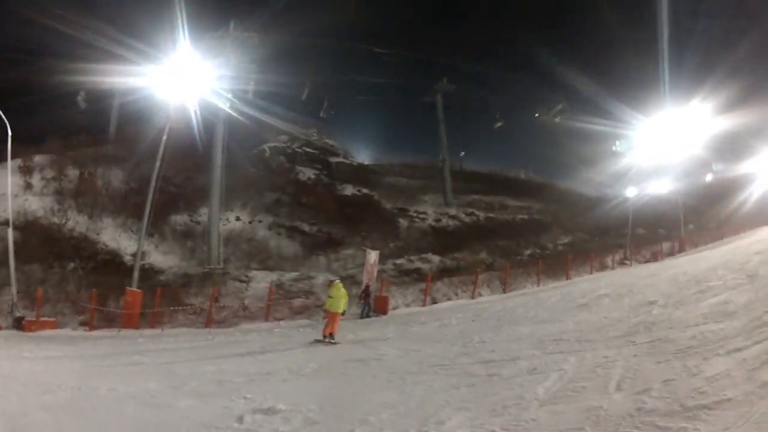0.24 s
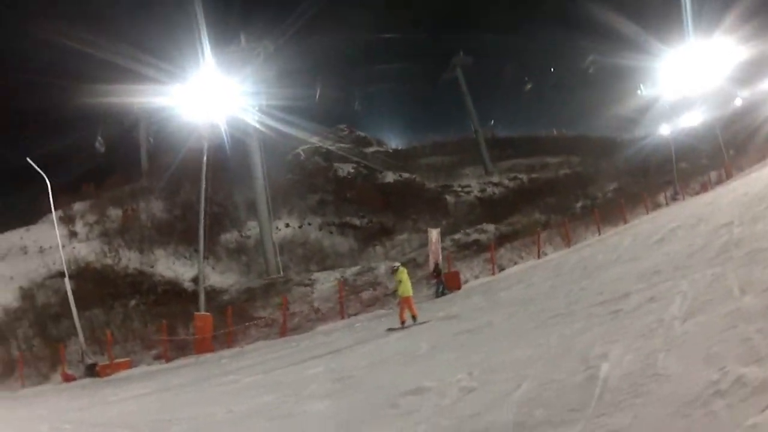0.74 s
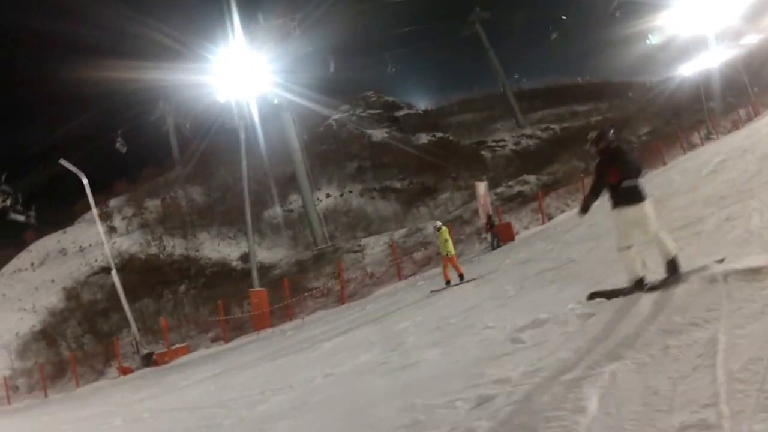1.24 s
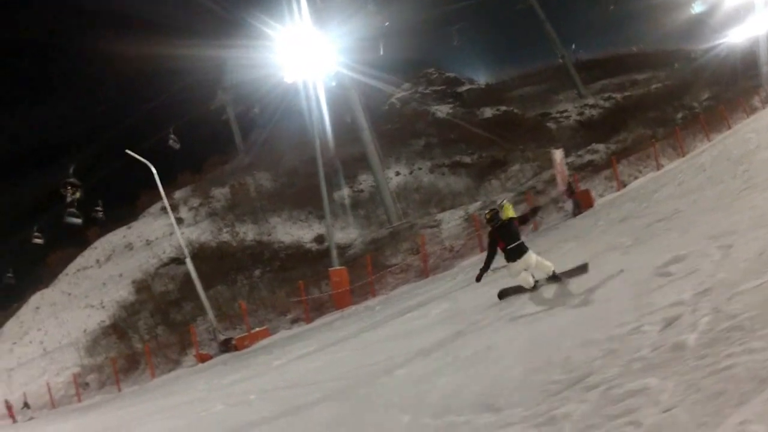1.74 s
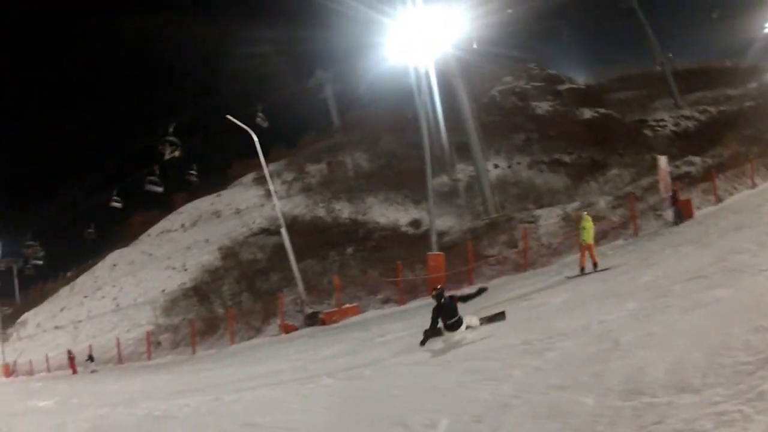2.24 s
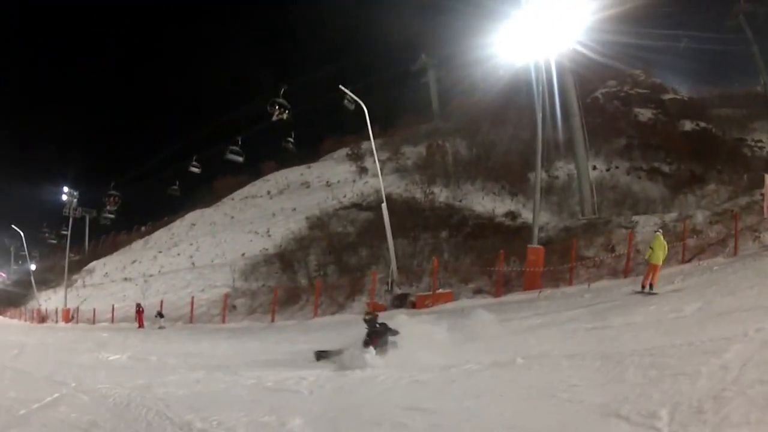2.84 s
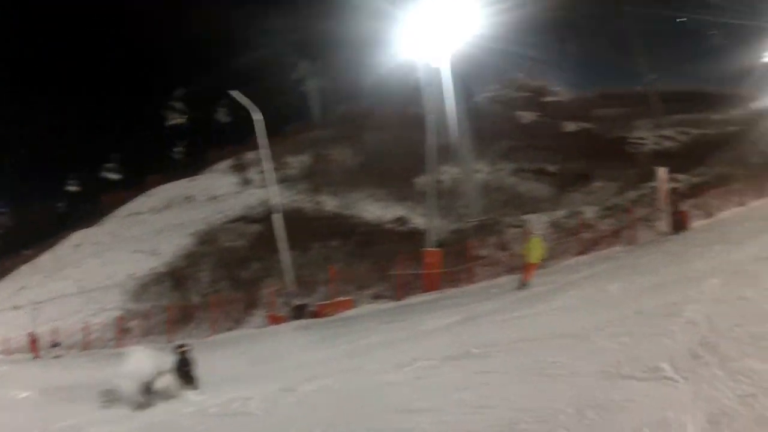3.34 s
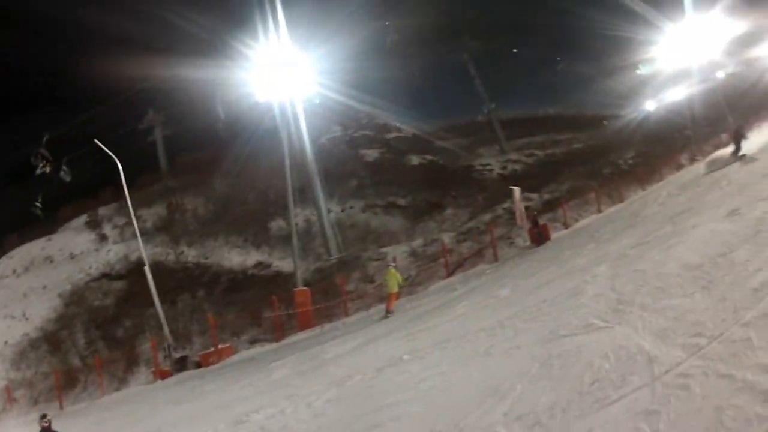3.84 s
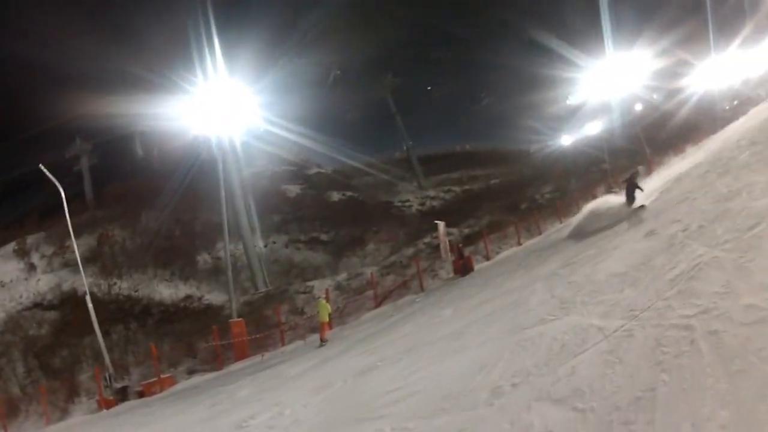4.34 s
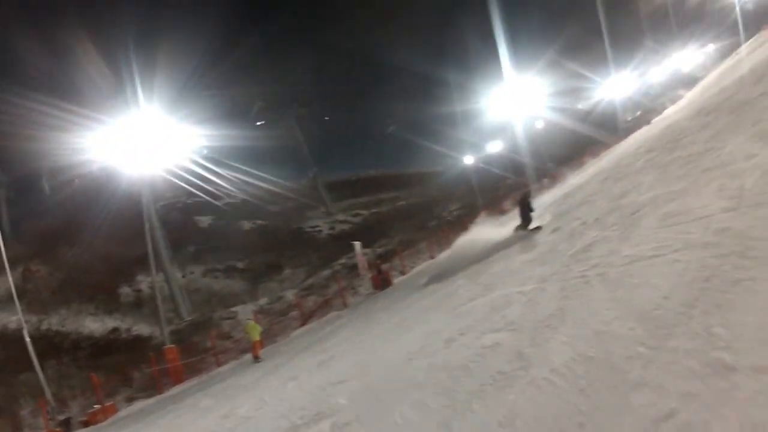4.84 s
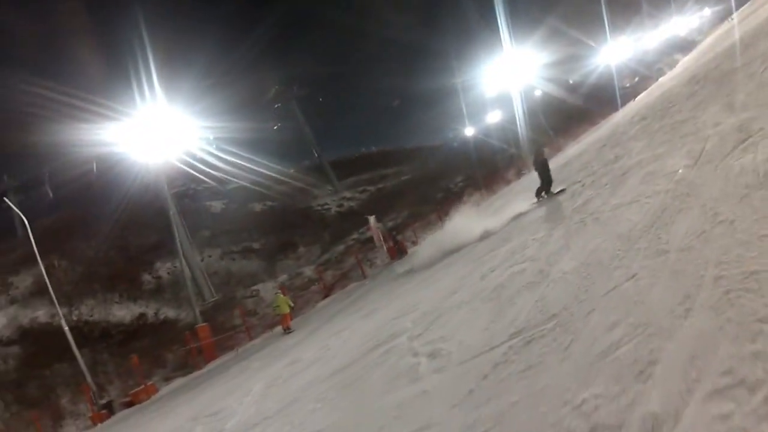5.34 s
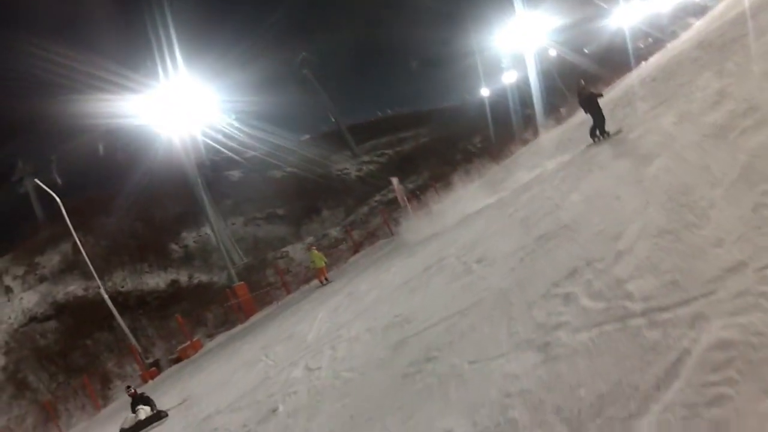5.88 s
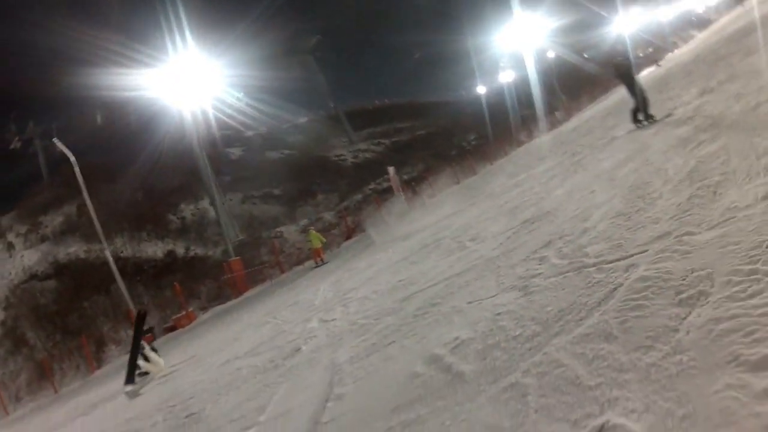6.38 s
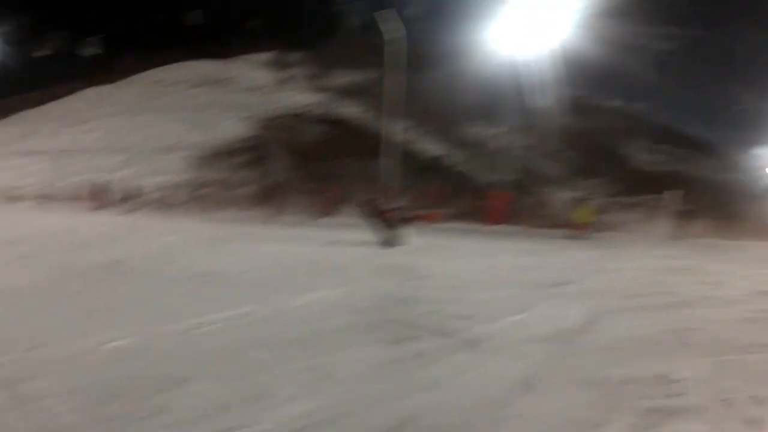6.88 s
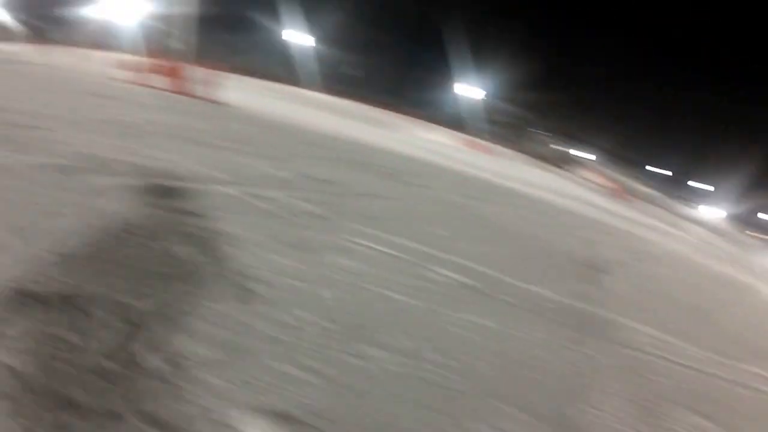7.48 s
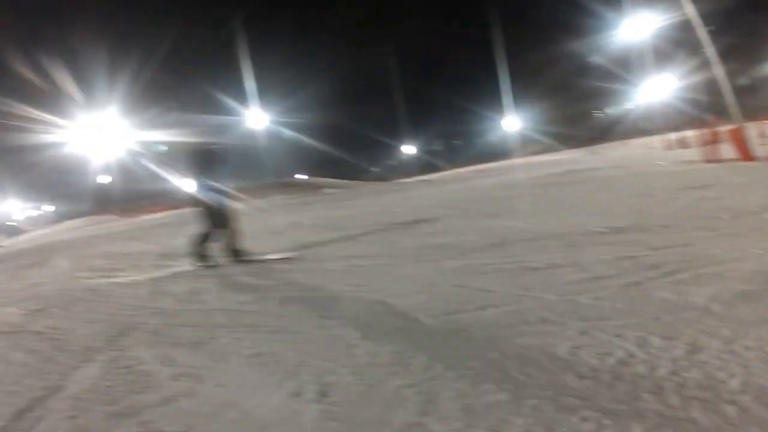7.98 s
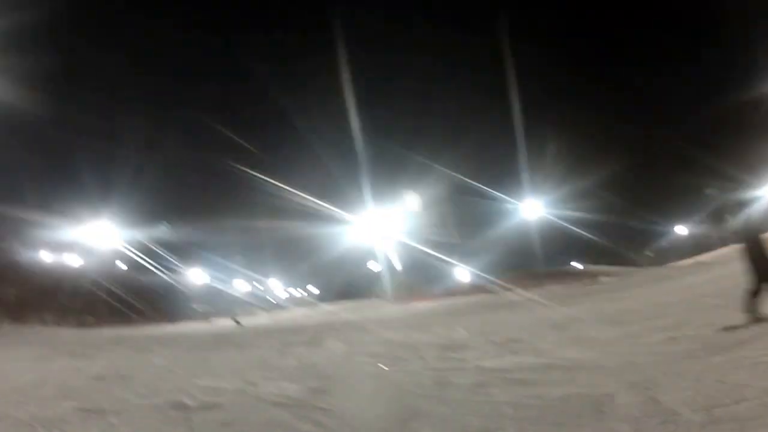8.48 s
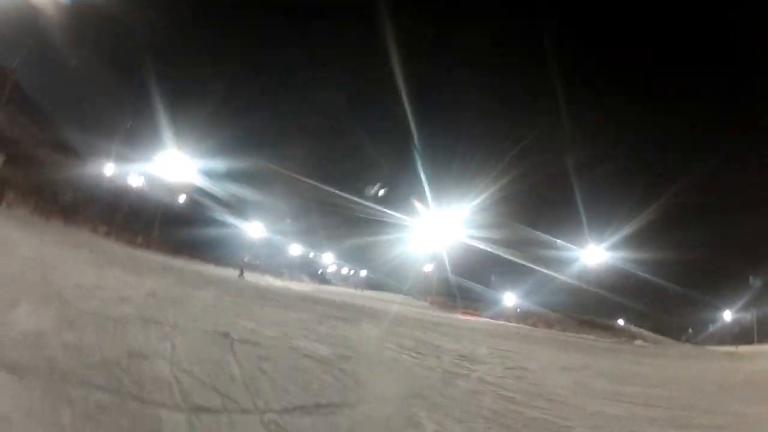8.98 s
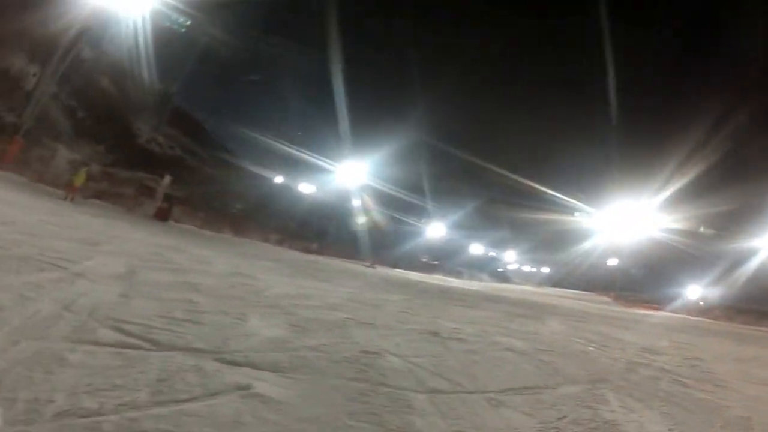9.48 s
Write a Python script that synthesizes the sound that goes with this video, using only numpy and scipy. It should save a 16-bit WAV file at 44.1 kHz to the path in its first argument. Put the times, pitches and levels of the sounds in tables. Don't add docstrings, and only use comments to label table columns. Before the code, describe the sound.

Heard from a small camera sealed in a plastic case on a night ski slope, a snowboard edge hisses and scrapes across groomed snow, swelling and fading with turns. Ice chips tick the shell and wind rumbles low. One short hard scrape stands out early on; near the end a violent knock and a second blow lead into creaks and glove rubbing.

```python
import sys
import numpy as np
from scipy import signal
from scipy.fft import rfft, irfft, next_fast_len
from scipy.io import wavfile
from scipy.ndimage import uniform_filter1d

SR = 44100
rng = np.random.default_rng(int(sys.argv[2]) if len(sys.argv) > 2 else 0)


def magnitude_from_level(level_db):
    exponent = np.asarray(level_db, float) / 20
    return 10 ** exponent


def wrap_up_sound(samples):
    columns = np.atleast_2d(samples).T
    tamed = np.clip(columns, -1, 1)
    steps = np.round(tamed * 32767).astype(np.int16)
    wavfile.write(sys.argv[1], SR, steps)


N = 428632
MEAN_SCRAPE_DB = -48


def rms_one(x):
    return x / np.sqrt(np.mean(x ** 2) + 1e-20)


def in_time(rows):
    s, *columns = np.transpose(rows)
    return [np.interp(np.arange(N) / SR, s, column) for column in columns]


def swell(s, hold_s, attack_s, release_s):
    corners = np.cumsum([-attack_s, attack_s, abs(hold_s), release_s])
    return np.interp(np.arange(N) / SR - s, corners, [0, 1, 1, 0])


def drift(rate_hz):
    pole = np.exp(-40 * np.pi * rate_hz / SR)
    noise = rng.standard_normal(N // 20 + 2002)
    slow = signal.lfilter([1], [1, -2 * pole, pole * pole], noise)[2000:]
    return np.interp(np.arange(N) / 20, np.arange(len(slow)), rms_one(slow))


def resonance(x, hz, width_hz):
    r = np.exp(-np.pi * width_hz / SR)
    feedback = [1, -2 * r * np.cos(2 * np.pi * hz / SR), r * r]
    return signal.lfilter(np.array([1, 0, -1]) * (1 - r * r) / 2, feedback, x)


def double_resonance(x, hz, width_hz):
    return resonance(resonance(x, hz, width_hz), hz, width_hz)


def highpass(x, hz):
    return signal.sosfilt(signal.butter(4, hz, "high", fs=SR, output="sos"), x)


def coloured(x, spectrum):
    size = next_fast_len(N)
    hz, level_db = np.transpose(spectrum)
    bins_hz = np.arange(size // 2 + 1) * SR / size + 1e-3
    shape_db = np.interp(np.log(bins_hz), np.log(hz), level_db, -90, -90)
    return rms_one(irfft(rfft(x, size) * magnitude_from_level(shape_db), size)[:N])


def rings(events, rough, rise_s):
    out, t = np.zeros(N + 4000), np.arange(4000) / SR
    noises = rng.standard_normal((len(events), 4000))
    for (s, peak_db, hz, t60), noise in zip(events, noises):
        fade = magnitude_from_level(-60 * t / max(t60, .002)) * (1 - np.exp(-t / rise_s))
        tone = np.sin(2 * np.pi * hz * t) * fade / fade.max()
        burst = double_resonance(noise * fade, hz, hz * 0.29)
        out[round(s * SR):][:4000] += magnitude_from_level(peak_db) * (tone + rough * burst / np.abs(burst).max())
    return out[:N]


# (time [s], scrape level [dB], how squarely the housing faces it [dB], weight of the board's body [dB])
EDGE_PASSES = [
    [(0.0, -53, -3.5, -6), (0.5, -52.5, -1, -2.5), (1.15, -49, -0.5, 0.5), (1.4, -47, -2, 5.5),
     (1.75, -43, -2.5, 7), (1.97, -46.5, -6, 5), (2.1, -49.5, -2.5, 3.5), (2.75, -43, -2, -0.5),
     (3.1, -50.5, -2, -1)],
    [(3.47, -46.5, -0.5, -3), (3.6, -40.5, -1, -5.5), (3.68, -34, -7, -4.5), (3.8, -35, -4.5, 1),
     (3.92, -36, -5.5, 8), (4.0, -39.5, -6, 3.5), (4.08, -46.5, -4, 2)],
    [(4.45, -50.5, -0.5, 0), (5.0, -51, 2, 0.5), (5.3, -49.5, 4, -1), (5.6, -50, 3.5, 0.5),
     (6.15, -51, 1, 1), (6.45, -52, 1, 0), (6.8, -52.5, 0.5, -3.5), (6.98, -46.5, -6.5, 3)],
    [(7.18, -42.5, -8, 5), (7.45, -42, -0.5, -1), (7.75, -44, -4, -4.5), (8.12, -56, -1.5, 8)],
    [(8.25, -50.5, -4, 13), (8.6, -49, -2, 12.5), (9.0, -47, -7, 0.5), (9.25, -49, -7, 4),
     (9.45, -51, -3, 1), (9.72, -51.5, -3, 17)],
]
# (time [s], extra level [dB], hold [s])
BITES = [(1.3, 1, 0.15), (1.9, 0, 0.075), (2.457, 4.5, 0.0127), (2.614, 5, 0.0243), (2.938, 2, 0.058),
         (3.5, 6, 0.048), (3.66, 0.5, 0.016), (4.574, 3, 0.077), (4.713, 2, 0.126), (5.107, -1, 0.084),
         (6.143, 2, 0.26), (6.51, 2, 0.069), (7.483, -0.5, 0.041), (7.627, 4, 0.085), (7.81, 2, 0.12)]


def load():
    scrape_db, facing_db, weight_db = in_time(sum(EDGE_PASSES, []))
    for s, extra_db, hold_s in BITES:
        scrape_db = scrape_db + extra_db * swell(s, hold_s, attack_s=.02, release_s=.03)
    return scrape_db, facing_db, weight_db


def crunch(per_s, spread_db, share, chatter_db):
    sizes = magnitude_from_level(spread_db * np.minimum(rng.exponential(1, N), 4.0)) * rng.choice([-1, 1], N)
    breaking = rng.random(N) < per_s * magnitude_from_level(4.0 * drift(25.0)) / SR
    mix = share * rms_one(sizes * breaking) + (1 - share) * rng.standard_normal(N)
    return rms_one(mix * magnitude_from_level(chatter_db * (drift(77.0) + 0.34 * drift(4.4))))


# (frequency [Hz], width [Hz], signed gain)
HOUSING_MODES = [(1258, 85, -0.953), (1464, 193, 0.9), (1917, 286, 0.63), (2284, 241, -1.17),
                 (2656, 216, 1), (3285, 266, 0.64), (3660, 240, -0.53)]
HOUSING_LEVELS = [-3.5, 3, 2.5, 0.5, -5.5, 33, 27]


def housing(x):
    x = highpass(x, 1130.0)
    modes = []
    for (hz, width_hz, sign), level_db in zip(HOUSING_MODES, HOUSING_LEVELS):
        modes.append(sign * magnitude_from_level(level_db) * resonance(x, hz, width_hz))
    return sum(modes[:2]), sum(modes[2:5]), sum(modes[5:])


# (frequency [Hz], level [dB per Hz])
BOARD_SPECTRUM = [(150, -60), (250, 7), (480, 4.5), (600, 1.5), (710, 3), (1000, -5), (1180, 1),
                  (1620, -32.5)]


def carve():
    scrape_db, facing_db, weight_db = load()
    extra_db = scrape_db - MEAN_SCRAPE_DB
    low_db = -12.5 + 0.72 * weight_db - 0.035 * extra_db
    top_db = -5.5 + facing_db - 0.088 * extra_db
    board_db = -18.5 + 0.57 * weight_db - 0.42 * extra_db
    snow = crunch(per_s=650.0, spread_db=4.5, share=0.35, chatter_db=0.5)
    low, middle, top = map(rms_one, housing(snow))
    shell = magnitude_from_level(low_db + 3.0) * low + magnitude_from_level(2.5) * middle + magnitude_from_level(top_db + 4.5) * top
    board = magnitude_from_level(board_db + 4.5) * coloured(snow, BOARD_SPECTRUM)
    return magnitude_from_level(scrape_db) * (shell + board)


# (time [s], peak level [dB], t60 [s])
CHIPS = [(.4628, -40, .02), (1.0934, -41.5, .02), (1.2735, -39, .02), (1.2917, -30, 0.018),
         (1.8317, -28, .02), (2.0916, -32, .02), (2.1849, -38, 0.024), (2.5222, -36, .02),
         (3.4431, -33, .02), (3.4825, -34, 0.0187), (3.984, -34.5, .015), (4.147, -31, .02),
         (5.5677, -32, 0.019), (5.5892, -33, .02), (6.2956, -33.5, .02), (7.1352, -31, .02),
         (7.3657, -29.5, .02), (7.8595, -38.5, .02), (1.9667, -29.5, 0.024), (2.462, -22.5, 0.014),
         (2.6115, -34, .02), (2.623, -21.5, 0.019), (2.6903, -29, 0.043), (2.8958, -30, 0.023),
         (2.9297, -29.5, 0.024), (3.0662, -33, .02), (3.6456, -22, 0.033), (3.68, -20, 0.035),
         (3.7695, -19.5, .02), (3.9035, -18, 0.023), (4.1986, -25.5, 0.016), (6.158, -28, 0.023),
         (6.1868, -29, 0.067), (6.2373, -28.5, 0.03), (6.7085, -31.5, 0.029), (7.033, -33, 0.036),
         (7.1577, -26, 0.02), (7.1853, -24, 0.035), (7.23, -28, 0.032), (7.4026, -29.5, .02),
         (7.4605, -29, 0.04), (7.5243, -18, 0.0131), (7.8057, -31, .02), (8.0175, -32.5, 0.0193)]


def chips():
    out, t = np.zeros(N + 2000), np.arange(2000) / SR
    facing_db = load()[1]
    noises = rng.standard_normal((len(CHIPS), 2000))
    for (s, peak_db, t60), noise in zip(CHIPS, noises):
        low, middle, top = map(rms_one, housing(noise * magnitude_from_level(-60 * t / max(t60, .003))))
        top_db = -4.0 + 2.4 * facing_db[round(s * SR)]
        burst = magnitude_from_level(-12.0) * low + middle + magnitude_from_level(top_db) * top
        out[round(s * SR):][:2000] += magnitude_from_level(peak_db) * burst / np.abs(burst).max()
    return out[:N]


# (time [s], first swing [signed amplitude], start pitch [Hz], end pitch [Hz], t60 [s])
KNOCKS = [
    (0.125, -.035, 60, 46, 0.19),
    (0.254, 0.09, 71.5, 64.4, 0.14),
    (8.1827, -0.82, 76, 77, 0.15),
    (8.186, 0.81, 67, 33.5, 0.32),
    (8.401, 0.296, 102.7, 39.2, 0.12),
    (8.432, -0.18, 84, 31, 0.55),
]


def knocks():
    out, t = np.zeros(N), np.arange(N) / SR
    for s, swing, start_hz, end_hz, t60 in KNOCKS:
        age = np.maximum(t - s, 0)
        turns = end_hz * age + (start_hz - end_hz) * 0.0112 * (1 - np.exp(-age / 0.011))
        envelope = magnitude_from_level(-60 * age / t60) * (1 - np.exp(-age / 0.0012))
        out += swing * envelope * np.sin(2 * np.pi * turns)
    return out


# (time [s], peak level [dB], pitch [Hz], t60 [s])
THUDS = [(.123, -47.5, 704, 0.045), (.123, -42, 1340, 0.04), (.123, -45, 1560, .03), (.125, -42, 2700, .03),
         (.123, -44, 290, 0.054), (.246, -40.5, 1430, 0.02), (.246, -36.5, 280, 0.029),
         (.246, -54, 760, 0.048), (.798, -44.5, 186, 0.032), (1.041, -46, 240, 0.041),
         (2.5, -40.5, 230, 0.044), (.298, -45, 240, .03), (2.969, -45, 206, 0.035), (5.5, -46, 297, 0.035),
         (4.965, -50, 650, 0.018), (4.965, -48, 820, .02), (3.984, -40, 760, .015), (3.3, -51, 950, 0.027),
         (8.925, -46, 290, .09), (8.975, -44, 270, .07), (8.845, -45, 270, .05), (8.184, -26.5, 527, 0.044),
         (1.42, -46, 380, .04), (2.5, -39, 1300, .03), (4.965, -46, 1080, 0.013), (.246, -40, 2100, 0.017),
         (5.6, -45, 460, 0.023), (6.16, -45, 280, 0.037), (7.187, -38, 1200, .04), (7.525, -42, 980, 0.014),
         (7.117, -38.5, 262, 0.058), (7.438, -33.5, 200, 0.03), (8.183, -25, 220, 0.077),
         (8.184, -18.5, 725.4, 0.051), (8.184, -16, 315, 0.041), (8.399, -34, 390, 0.079),
         (8.4, -36, 750, 0.072), (8.428, -43, 293, 0.087), (8.86, -42, 280, 0.048)]


def thuds():
    return rings(THUDS, rough=0.29, rise_s=0.00064)


# (time [s], peak level [dB], ring [Hz], t60 [s])
LOOSE_PARTS = [(8.165, -42, 1460, 0.0081), (8.1822, -8.5, 1850, 0.024), (8.183, -26, 3175, 0.0087),
               (8.183, -20, 1245, 0.068), (8.194, -14, 2438, 0.011), (8.194, -23, 1490, 0.012),
               (8.1955, -21, 2150, 0.0097), (8.197, -24, 3300, 0.0082), (8.203, -17.5, 1800, 0.0064),
               (8.21, -23.5, 1910, 0.025), (8.259, -36, 2200, 0.012), (8.3991, -21, 1236, 0.013),
               (8.4008, -24, 1840, 0.0157), (8.406, -27.5, 2046, 0.014)]


def rattles():
    return highpass(rings(LOOSE_PARTS, rough=0.84, rise_s=0.0015), 1120.0)


# (time [s], peak level [dB], ring [Hz])
CREAKS = [(8.2787, -44.5, 1750), (8.4268, -27, 1320), (8.4268, -32, 1800), (8.4871, -42.5, 2440),
          (8.5206, -29, 1750), (8.5909, -38, 1310), (8.7088, -35, 1820), (8.888, -31, 2280),
          (8.925, -31, 1850), (8.4659, -27, 1920), (8.467, -39, 1400), (8.652, -31.5, 2143),
          (8.8123, -33, 2010), (8.829, -25, 1970), (8.865, -26, 2170), (8.901, -31, 2010),
          (8.9121, -28.5, 1900), (8.937, -24.5, 2050), (8.95, -29, 2140), (8.9805, -27.5, 1940),
          (9.006, -29, 1860), (9.0545, -36.5, 2100), (9.0804, -40, 1930), (9.127, -30.5, 2100),
          (9.1711, -34, 2190), (9.2156, -33, 1700), (9.426, -39, 2165), (9.5013, -45, 2140),
          (9.5822, -40, 1900), (9.037, -26.5, 1970), (9.059, -27, 1900), (9.0912, -31, 2010),
          (9.1144, -26, 1950), (9.1517, -30, 1940), (9.204, -25, 2120), (9.2324, -32, 2250),
          (9.2516, -28, 1860), (9.2767, -26.5, 1960), (9.29, -27, 1940), (9.313, -20.5, 1900),
          (9.3121, -17, 2190), (9.333, -34, 1950), (9.3437, -31, 1980), (9.689, -22.5, 1900),
          (9.697, -25.5, 1883)]
# (frequency [Hz], level against the creak [dB])
PARTNER_MODES = [(1400, -15.5), (1830, -15), (2320, -15)]


def creaks():
    t60 = 0.01
    slips = [(s, db, hz, t60) for s, db, hz in CREAKS]
    for s, db, _ in CREAKS:
        for hz, below_db in PARTNER_MODES:
            slips.append((s, db + below_db + 3.0 * rng.standard_normal(), hz, t60 * 1.3))
    return highpass(rings(slips, rough=0.34, rise_s=0.00091), 1120.0)


# (time [s], level [dB], hold [s], mode of the part under the hand [Hz])
STROKES = [(8.215, -45.5, 0.094, 1300), (8.36, -36.5, 0.045, 1240), (8.37, -43.5, .02, 1890),
           (8.4, -40, 0.018, 1880), (8.517, -33.5, 0.011, 1760), (8.53, -46, 0.038, 1330),
           (8.544, -36.5, .01, 1660), (8.557, -40, .008, 1880), (7.4, -43, 0.022, 1300),
           (8.605, -44, .04, 2100), (8.64, -50, 0.03, 760), (8.662, -42, 0.03, 1780),
           (8.71, -39, .02, 1830), (8.713, -39, 0.053, 1370), (8.72, -48, 0.025, 760),
           (8.747, -40.5, .012, 2120), (8.853, -52, .02, 760), (8.865, -40, 0.018, 1270),
           (9.6, -44, .12, 2250), (8.887, -40, 0.1, 1850), (8.9, -47, 0.07, 1270), (9.005, -42, .16, 1890),
           (9.027, -48, .03, 1300), (9.11, -51.5, .15, 1360), (9.17, -45.5, 0.09, 1800),
           (9.286, -43, .03, 1800), (9.588, -47, 0.04, 1300), (9.594, -46, .01, 1850),
           (9.61, -56.5, .02, 760), (9.638, -45, 0.04, 1390), (9.655, -52, .02, 760),
           (9.688, -45, .015, 1700)]
# (frequency [Hz], width [Hz], level [dB])
UNDER_HAND = [(760, 38, -2.5), (1300, 310, -3.5), (1800, 220, -2), (2100, 300, -2.5)]


def rub():
    slips = crunch(per_s=1100.0, spread_db=-2.0, share=0.21, chatter_db=-1.5)
    part_hz, widths_hz, trims_db = np.transpose(UNDER_HAND)
    out = np.zeros(N)
    for s, db, hold_s, hz in STROKES:
        ring = rms_one(double_resonance(slips, hz, np.interp(hz, part_hz, widths_hz)))
        level = magnitude_from_level(db + np.interp(hz, part_hz, trims_db))
        out += level * swell(s, hold_s, attack_s=0.0095, release_s=0.029) * ring
    return out


# (time [s], level [dB])
ARM_SWING = [(0.0, -46), (1.33, -51), (2.49, -58), (3.36, -55.5), (3.81, -49), (4.0, -58.5), (6.98, -41),
             (7.88, -55.5), (8.31, -35), (8.5, -37.5), (9.2, -57.5), (9.72, -45.5)]
# (time [s], level [dB], t60 [s])
SHUDDERS = [
    (8.188, -24.5, 0.38),
    (8.402, -29.5, 0.32),
    (8.57, -48, .3),
    (8.84, -43.5, 0.69),
]


def handling():
    t = np.arange(N) / SR
    wobble = rms_one(double_resonance(rng.standard_normal(N), 70, 15.8))
    fade = sum((t > s) * magnitude_from_level(db - 60 * np.abs(t - s) / t60) for s, db, t60 in SHUDDERS)
    dull = [(50, 9), (90, 1), (200, -10.5), (400, -25), (700, -43)]   # (Hz, dB per Hz)
    shudder = fade * magnitude_from_level(4.0 * drift(30.0)) * coloured(rng.standard_normal(N), dull)
    return magnitude_from_level(in_time(ARM_SWING)[0] - 2.5) * wobble + shudder


# (time of the peak [s], level [dB], length [s])
GUSTS = [(0.109, -33, 0.072), (0.254, -36, 0.078), (0.443, -32, 0.25), (0.773, -33.5, 0.29),
         (1.031, -34.5, 0.27), (1.316, -35.5, 0.11), (1.504, -32.5, 0.2), (1.699, -36, 0.126),
         (1.923, -38, 0.15), (2.36, -38, 0.23), (2.572, -37, 0.094), (2.864, -41, 0.41),
         (3.243, -37.5, 0.16), (3.522, -36, 0.068), (3.916, -40, 0.55), (4.616, -36.5, 0.24),
         (4.986, -37, 0.7), (5.464, -31.5, 0.19), (5.95, -39, 0.73), (6.187, -39, 0.1),
         (6.456, -35.5, 0.24), (6.72, -33.5, 0.17), (6.868, -27.5, 0.31), (7.2, -30.5, 0.27),
         (7.527, -33.5, 0.058), (7.74, -45, 0.099), (8.108, -39.5, 0.53), (8.753, -35, 0.112),
         (8.966, -38.5, 0.26), (9.51, -40, 0.042)]
# (frequency [Hz], level [dB per Hz])
BUFFET_SPECTRUM = [(8, -30), (14, -14), (24, -8), (33, 3), (42, -6), (60, -16), (100, -32), (170, -62)]
# (frequency [Hz], level [dB per Hz])
RUSH_SPECTRUM = [(59, -17), (100, 0.5), (145, -2.5), (173, -0.5), (286, -1.5), (450, -13.5), (580, -12.5),
                 (990, -120)]


def wind():
    t, lull_db = np.arange(N) / SR, -46.5
    power = magnitude_from_level(lull_db) ** 2
    for s, db, length_s in GUSTS:
        power = power + magnitude_from_level(db) ** 2 * np.exp(-(4 * (t - s) / length_s) ** 2 / 2)
    gust_db = 10 * np.log10(power)
    buffet = coloured(rng.standard_normal(N), BUFFET_SPECTRUM)
    buffet = buffet / (uniform_filter1d(buffet ** 2, size=SR // 14) + 0.079) ** 0.2
    buffet = magnitude_from_level(gust_db + 1.2) * rms_one(buffet)
    rush_db = -61 + 0.22 * (load()[0] - MEAN_SCRAPE_DB) + 0.039 * (gust_db - lull_db)
    rush = magnitude_from_level(rush_db + 2.4 * drift(5.0)) * coloured(rng.standard_normal(N), RUSH_SPECTRUM)
    return buffet + rush


# (frequency [Hz], level [dB])
FLOODLIGHTS = [(120, -68), (180, -69)]


def hum():
    t = np.arange(N) / SR
    return sum(magnitude_from_level(db + 1 + 1.4 * drift(3.8)) * np.sin(2 * np.pi * hz * t) for hz, db in FLOODLIGHTS)


def scene():
    snow = carve() + chips()
    hand = knocks() + thuds() + rattles() + creaks() + rub() + handling()
    return (snow + hand + wind() + hum())[None]


def band_limit(x):
    return signal.sosfilt(signal.butter(12, 15110, fs=SR, output="sos"), x)


def record(dry):
    sampling_hz, stairs = 8000, 4
    anti_alias = signal.cheby1(6, .5, 4210, fs=SR, output="sos")
    x = signal.sosfilt(anti_alias, np.clip(dry, -1.05, 1.05))
    coarse = signal.resample_poly(x, sampling_hz // 100, SR // 100, axis=1)
    held = np.repeat(coarse, stairs, axis=1)
    held = signal.resample_poly(held, SR // 100, stairs * sampling_hz // 100, axis=1)
    held = np.pad(held, ((0, 0), (0, 9)))[:, :N]
    top_cut = signal.cheby2(12, 60, 15240 + 600, fs=SR, output="sos")
    mix = np.clip(signal.sosfilt(top_cut, held), -1, 1)
    return band_limit(mix)


dry = scene()
out = record(dry)
wrap_up_sound(out)
```